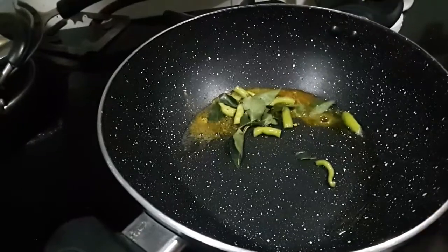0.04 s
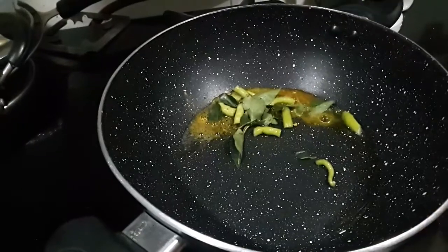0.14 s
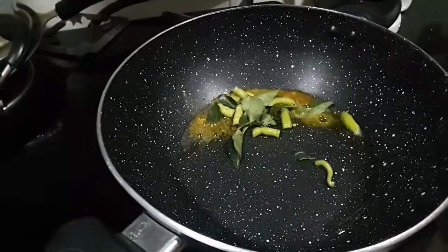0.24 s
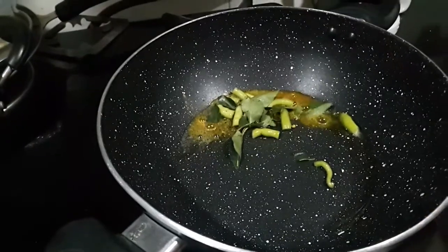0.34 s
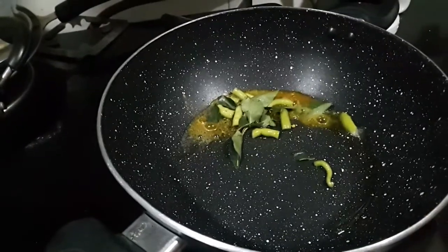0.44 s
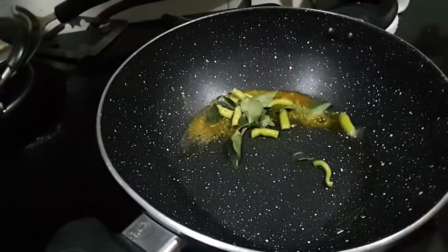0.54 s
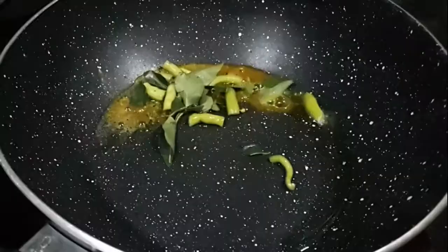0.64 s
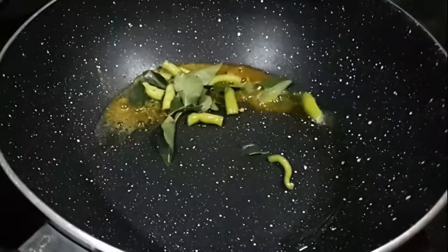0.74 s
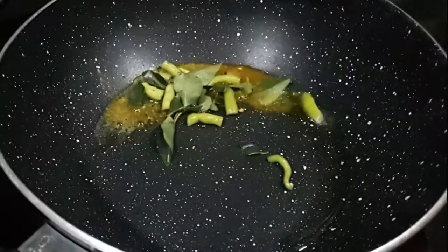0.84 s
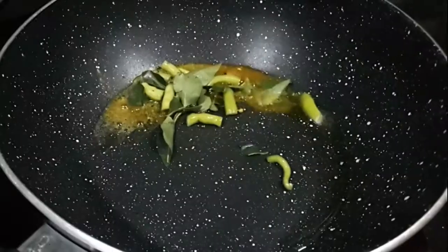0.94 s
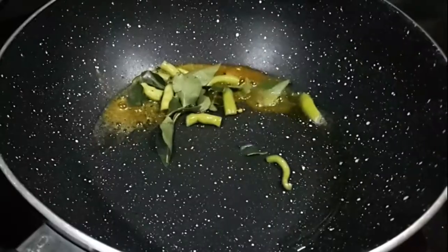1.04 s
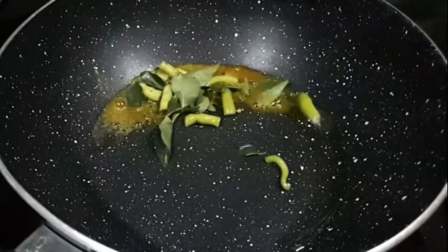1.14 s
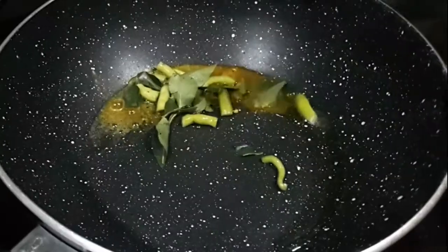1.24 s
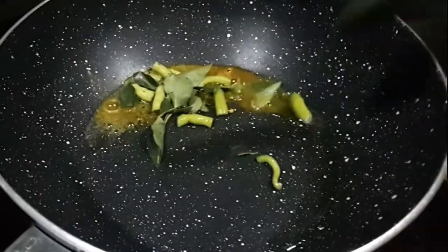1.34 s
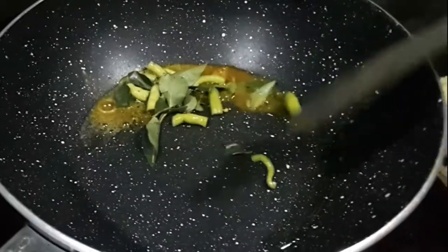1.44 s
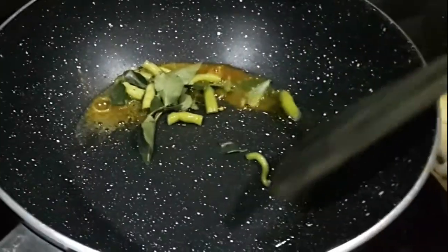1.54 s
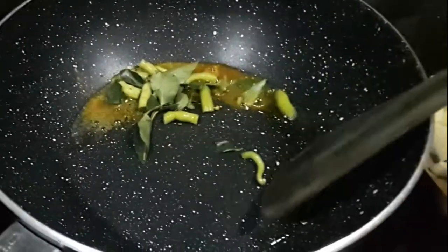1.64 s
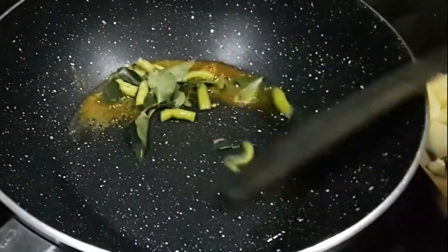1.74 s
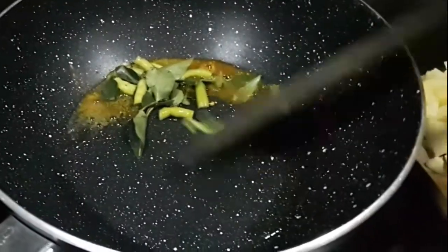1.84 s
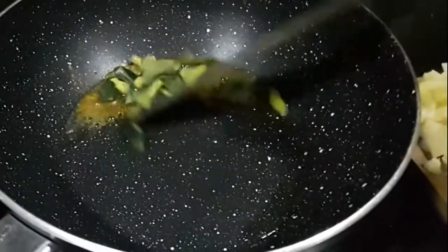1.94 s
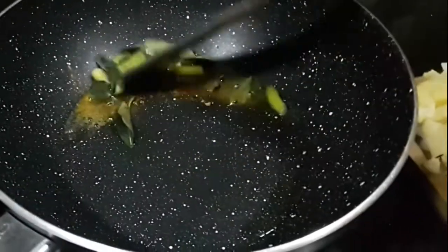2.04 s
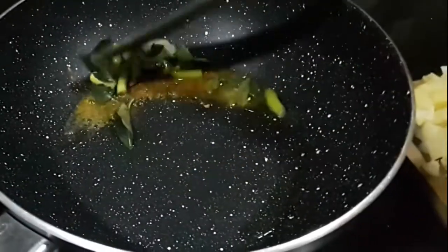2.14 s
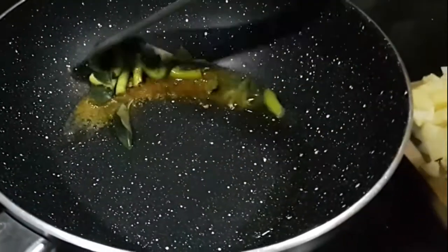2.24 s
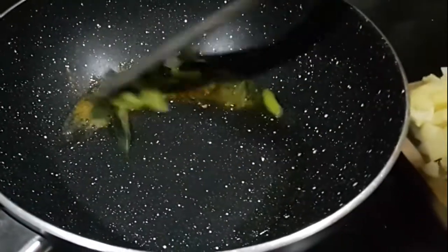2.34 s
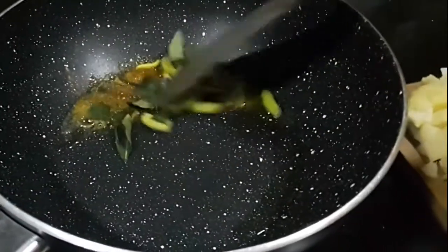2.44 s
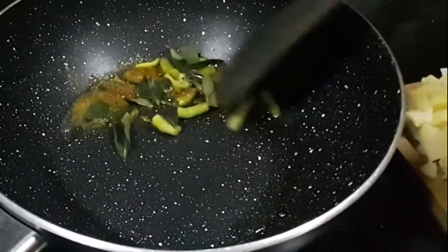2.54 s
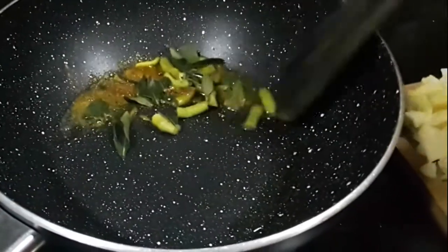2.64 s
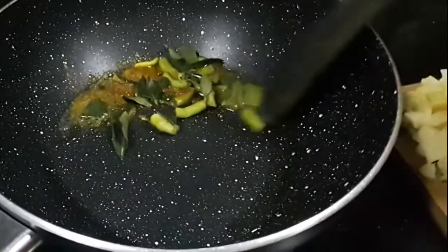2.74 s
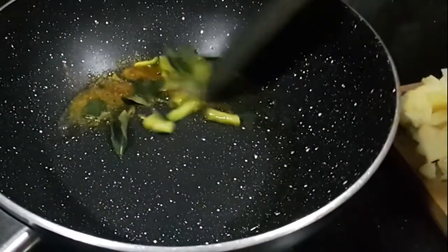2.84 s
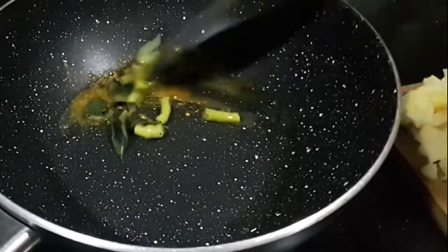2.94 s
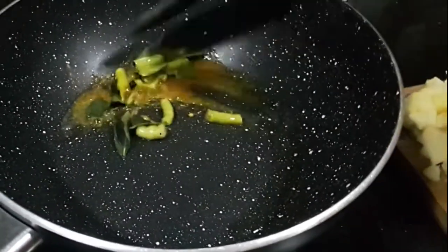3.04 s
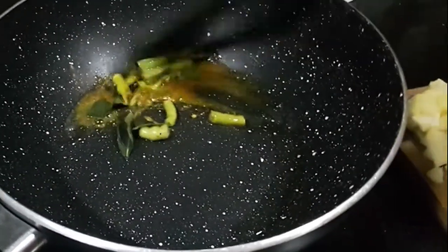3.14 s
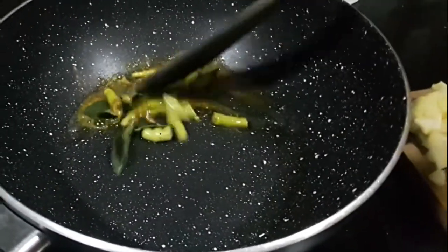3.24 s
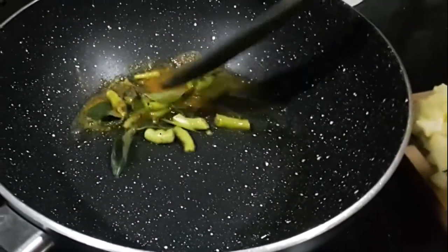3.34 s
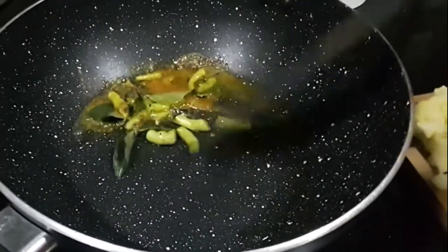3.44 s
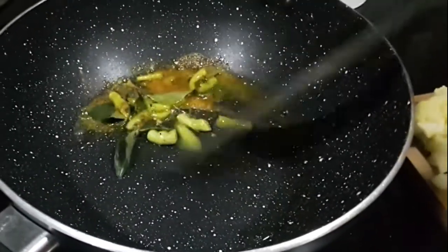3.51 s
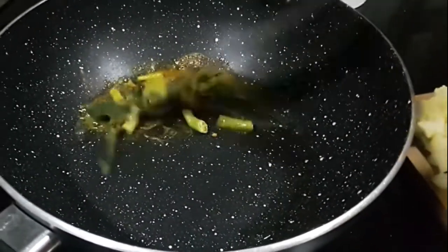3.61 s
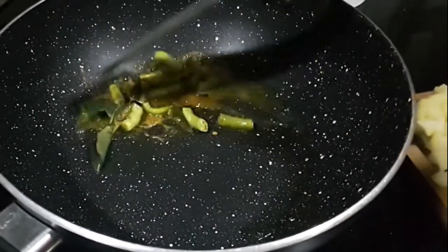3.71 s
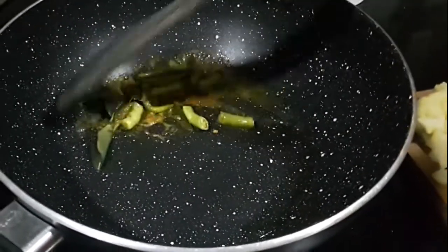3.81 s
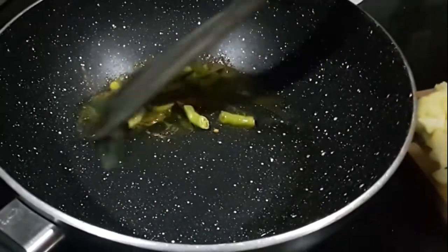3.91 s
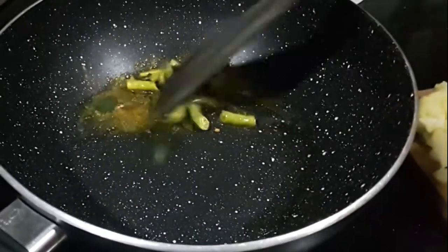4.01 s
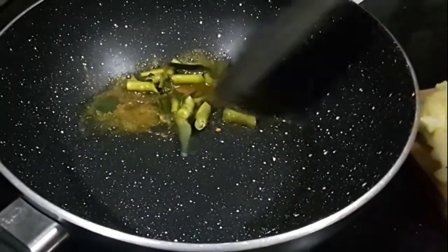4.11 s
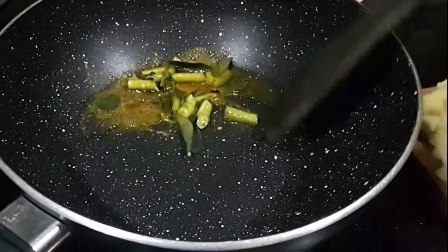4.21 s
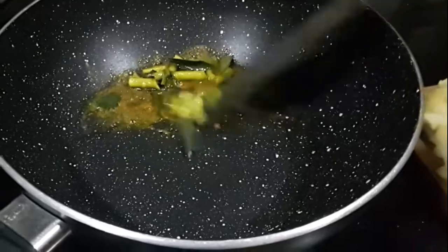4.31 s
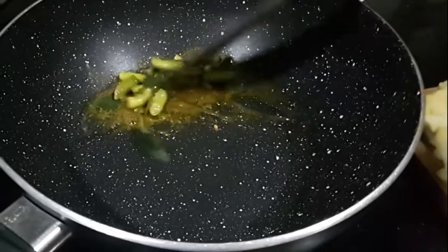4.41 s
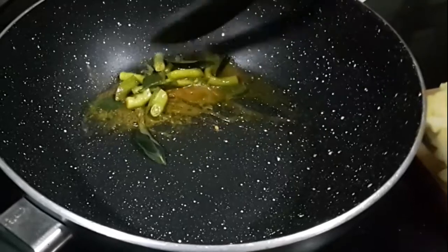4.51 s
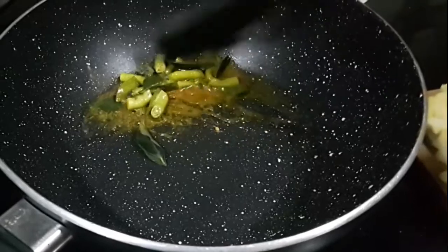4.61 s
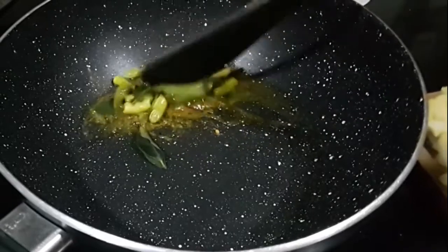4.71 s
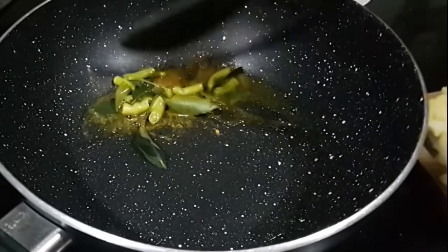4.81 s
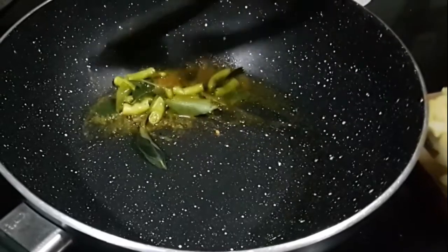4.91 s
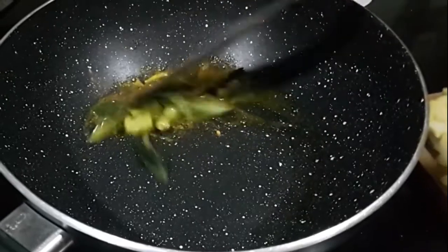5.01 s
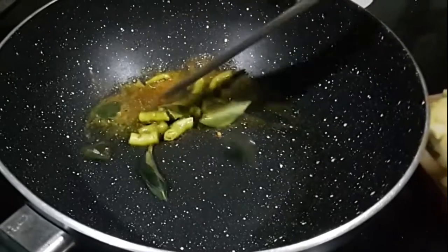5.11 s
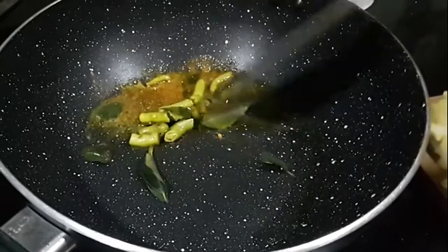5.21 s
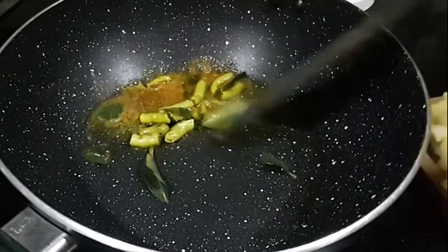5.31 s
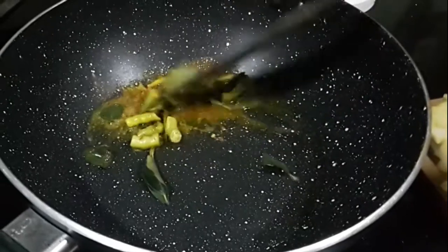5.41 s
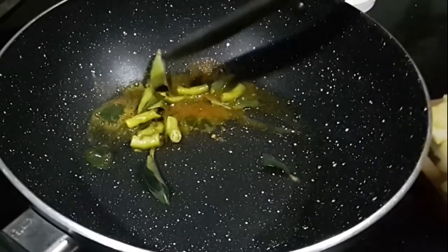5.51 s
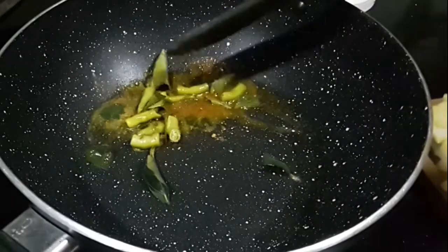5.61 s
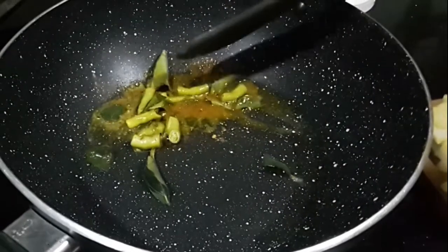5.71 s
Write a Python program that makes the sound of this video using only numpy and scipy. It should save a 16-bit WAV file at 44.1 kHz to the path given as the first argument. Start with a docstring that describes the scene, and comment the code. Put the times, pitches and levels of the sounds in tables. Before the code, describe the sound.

Close, crisp frying hiss with spits and crackles, then hollow metallic pan knocks and short scrapes over a faint low stove rumble.

```python
"""Chilies and leaves frying in a small kitchen

Close by, a little oil in a coated pan: steam bubbles burst as pings over a hiss, and stirring makes it swell.
Drops of water pop as short ringing noise and spit as puffs of noise. A spatula knocks and scrapes: the modes of
the pan ring, struck by blows or rubbed by tiny slips. The stove is a low steady rumble of filtered noise; a
diffuse tail places the oil and the spatula in the room, and short reflections follow the spatula."""
import sys
import numpy as np
from scipy import signal
from scipy.fft import rfft, irfft
from scipy.io import wavfile
from scipy.ndimage import uniform_filter1d

SR = 44100
rng = np.random.default_rng(int(sys.argv[2]) if len(sys.argv) > 2 else 0)


def unload_wav(signal):
    """Save mono or channel-first audio to the path in sys.argv[1] as 16-bit WAV at rate SR, clipped to [-1, 1]."""
    wavfile.write(
        sys.argv[1],
        SR,
        np.round(np.clip(np.atleast_2d(signal).T, -1, 1) * 32767).astype(np.int16),
    )


N = 254016
TIME = np.arange(N) / SR


def gain_of(db):
    """Decibels to amplitude."""
    return 10 ** (np.asarray(db) / 20)


def evened(x):
    """Scales to rms 1."""
    return x / np.sqrt(np.mean(x ** 2) + 1e-20)


def decay_of(t, t60):
    """Exponential decay that falls by 60 dB in t60 seconds."""
    return np.exp(-np.log(1000) * t / t60)


def sides(left_db):
    """Left and right gains whose ratio is left_db."""
    return gain_of([[left_db / 2], [-left_db / 2]])


def read(points, hz):
    """Reads a table on a log-frequency axis."""
    f, value = np.transpose(points)
    return np.interp(np.log(hz + 1), np.log(f + 1), value)


def add(mix, s, sound):
    """Adds a two-channel sound at time s, cut off at the end of the mix."""
    part = mix[:, round(s * SR):][:, :sound.shape[1]]
    part += sound[:, :part.shape[1]]


def coloured(x, spectrum):
    """Filters by a table of Hz and dB."""
    count = x.shape[-1]
    filter_gain = gain_of(read(spectrum, np.fft.rfftfreq(count, 1 / SR)))
    return irfft(rfft(x) * filter_gain, count)


def band_noise(hz, octaves, count):
    """Two channels of noise in a bell around hz."""
    f = np.fft.rfftfreq(count, 1 / SR) + 1
    bell = 1 / (1 + (np.log2(f / hz) / octaves) ** 2) ** 2
    return evened(irfft(rfft(rng.standard_normal((2, count))) * bell, count))


def stereo_noise(count):
    """White noise as a diffuse field gives it: alike on both sides in the bass only."""
    # Each row: frequency in Hz, left-right likeness from 0 to 1.
    likeness = [(60, 0.87), (150, 1), (300, 0.9), (700, 0.17), (1500, 0), (5000, 0)]
    a, b = rfft(rng.standard_normal((2, count)))
    same = np.clip(read(likeness, np.fft.rfftfreq(count, 1 / SR)), -1, 1)
    return irfft(np.array([a, same * a + np.sqrt(1 - same ** 2) * b]), count)


def drift(per_s):
    """Random wandering of rms 1, with little above per_s Hz."""
    lowpass = 1 / (1 + (np.fft.rfftfreq(N, 1 / SR) / per_s) ** 4)
    return evened(irfft(rfft(rng.standard_normal(N)) * lowpass, N))


def sizzle(hiss_db=-3, pings_db=-3, flicker_db=1.54, split_hz=5800):
    """Separate bubbles over the hiss of countless smaller ones; fine and coarse ones swell with the stirring."""
    # Colour of the frying. Each row: frequency in Hz, relative level per Hz in dB.
    fizz_colour = [(300, -52), (1000, -6), (1800, -4.5), (2500, -4), (3400, 0), (4400, 0), (5800, -4),
                   (7400, -6), (8500, -5), (9400, -1.5), (10500, -3.5), (12500, -5), (15600, -5)]
    # The bowl reflects each pitch differently to each side. Each row: frequency in Hz, left-right in dB.
    fizz_sides = [(60, 1.5), (99, 2.0), (160, 0.5), (270, 6), (450, 9), (740, -7), (1220, 11), (2010, 0.5),
                  (3330, 3), (5500, -1.5), (9080, 2), (15000, 0)]
    fine, coarse = frying()
    pings = bubbles(per_s=4500, spread_db=4.2, cycles=2.02, clump_db=0.5)
    hiss = rng.standard_normal((2, N))
    source = coloured(gain_of(pings_db) * pings + gain_of(hiss_db) * hiss, fizz_colour)
    lean_db = read(fizz_sides, np.fft.rfftfreq(N, 1 / SR))
    source = irfft(rfft(source) * gain_of([lean_db / 2, -lean_db / 2]), N)
    low = signal.sosfiltfilt(signal.butter(3, split_hz, fs=SR, output="sos"), source)
    fizz = evened(source - low) * fine + evened(low) * coarse
    return fizz * gain_of(flicker_db * drift(29))


def bubbles(per_s, spread_db, cycles, clump_db, count=64):
    """Bursting bubbles of many sizes: each a ping of a few cycles, arriving in clumps from all over the pan."""
    out, t = np.zeros((2, N)), np.arange(256) / SR
    for hz in np.geomspace(1500, 15500, count):
        events = round(per_s * N / SR / count)
        when, chance, sign = rng.random((events, 3)).T
        clump = np.interp(when, np.linspace(0, 1, 280), rng.standard_normal(280))
        # many small bursts and few strong ones
        size = gain_of(spread_db * np.minimum(-np.log(1 - chance), 4.8) + clump_db * clump)
        bursts = np.bincount((when * N).astype(int), size * np.sign(sign - .5), N)
        phase = rng.random((2, 1))  # in cycles, one per side
        ping = np.exp(-t * hz / cycles) * np.sin(2 * np.pi * (hz * t + phase))
        out += np.sqrt(hz) * evened(signal.oaconvolve(bursts[None], ping, axes=1)[:, :N])
    return evened(out)


def frying(hold_s=0.015, fall_db_per_s=70, simmer_coarse_db=-43, coarse_follows=0.95):
    """Amplitudes of fine fizz and coarse bubbling: the simmer plus a flare for each stir."""
    # Sizzle where the food lies still. Each row: time in seconds, level in dB.
    simmer = [(0, -42), (.5, -38.5), (.58, -35), (1.05, -38.5), (1.55, -40.5), (2.0, -39.5), (2.2, -33.5),
              (3.6, -35.5), (5.76, -37.5)]
    # Each stir turns wet sides into the oil and the sizzle flares.
    # Each row: start in seconds, peak in seconds, level in dB, coarse bubbling against fine fizz in dB.
    stirs = [(1.99, 2.263, -35.5, -8), (2.43, 2.69, -35.5, -3.5), (2.83, 3.03, -26.5, -7.5),
             (3.254, 3.36, -32.5, -15), (3.78, 4.087, -33, -11), (4.322, 4.448, -33.5, -20),
             (4.69, 4.768, -33, -15), (4.92, 5.12, -32, -8.5)]
    simmer_db = np.interp(TIME, *np.transpose(simmer))
    fine = gain_of(simmer_db) ** 2
    # the coarse bubbling follows a share of the simmer's swing
    coarse = gain_of(simmer_coarse_db + coarse_follows * (simmer_db - simmer_db.mean())) ** 2
    for start, peak, db, coarse_db in stirs:
        # a flare holds briefly, then dies as the water boils off
        fall_db = fall_db_per_s * np.maximum(TIME - peak - hold_s, 0)
        rise = np.interp(TIME, [start, peak], [0, 1]) ** 1.24
        power = rise * gain_of(db - fall_db) ** 2
        fine = fine + power
        coarse = coarse + power * gain_of(coarse_db) ** 2
    return np.sqrt(fine), np.sqrt(coarse)


def spatter(pop_db=-1, spit_db=3):
    """Water drops explode in the oil as sharp pops, or vent as brief jets."""
    # The loudest pops, before pop_db. Each row: time in seconds, peak in dB, pitch in Hz, decay time in seconds.
    loud_pops = [(.230, -21, 12100, 0.00067), (0.3411, -19, 5440, 0.00089), (.538, -13, 8700, .0015),
                 (.655, -17, 8000, 0.00036), (.8261, -17, 6170, 0.0011), (.9896, -13, 9000, .0006),
                 (1.172, -18.5, 7500, .0007), (1.2307, -21, 5400, .0019), (1.2966, -23.5, 5000, 0.0026),
                 (1.6385, -25, 4900, .0025), (1.6677, -24, 8700, 0.0027), (2.1641, -17, 9600, 0.0057),
                 (2.2866, -19, 9100, 0.0049), (2.437, -21, 4050, 0.0023), (3.1474, -21.5, 5550, 0.0053),
                 (3.726, -21.5, 7040, 0.00079), (4.2923, -22, 5200, .0035), (5.685, -12.5, 10500, 0.00055)]
    # Spits, short jets of steam, before spit_db.
    # Each row: time in seconds, level in dB, pitch in Hz, decay time in seconds.
    steam_jets = [(0.525, -34.5, 3300, 0.017), (0.537, -28, 11000, 0.0053), (0.572, -35, 5000, 0.006),
                  (0.674, -35.5, 4080, 0.0094), (1.18, -34.5, 4560, 0.0084), (2.111, -35.5, 4300, 0.0065),
                  (2.268, -37, 3360, 0.018), (2.619, -31, 3400, 0.014)]
    out, t = np.zeros((2, N)), np.arange(SR // 5) / SR
    for s, db, hz, decay in loud_pops + small_pops():
        octaves = .55 * (.001 / decay) ** 0.53  # the longer a pop rings, the purer it is
        pop = band_noise(hz, octaves, count=len(t)) * np.exp(-t / decay)
        add(out, s, gain_of(db + pop_db) * pop / abs(pop.mean(0)).max())
    for s, db, hz, decay in steam_jets:
        puff = np.sqrt(2 * np.e * t / decay) * np.exp(-t / decay)  # peaks at 1
        add(out, s, gain_of(db + spit_db) * puff * band_noise(hz, octaves=0.72, count=len(t)))
    return out


def small_pops(per_s=6):
    """Lesser pops at random moments, in rows like those of the loudest pops."""
    count = round(per_s * N / SR)
    when = rng.uniform(0, N / SR, count)
    peak_db = rng.uniform(-32.5, -24.5, count)
    hz = rng.uniform(2960, 9800, count)
    decay_s = rng.uniform(.0005, 0.0039, count)
    return list(zip(when, peak_db, hz, decay_s))


def knocks(rattle_t60=0.096, crack_db=3, crack_t60=0.0055, blade_left_db=6, blade_t60=0.042):
    """Each blow cracks, then rings the pan, the blade and a dense short rattle; soft blows lose their treble."""
    # Colour of crack and rattle. Each row: frequency in Hz, level in dB.
    clack_colour = [(50, -40), (130, -20), (200, -26), (270, -8.5), (420, -16), (530, -14), (680, 9.5),
                    (1000, -2.5), (1350, 1.5), (1700, -5), (2200, 1), (3500, -3.5), (4200, -11),
                    (9000, -39)]
    out, t = np.zeros((2, N)), np.arange(SR // 2) / SR
    fade = gain_of(crack_db) * decay_of(t, crack_t60) + decay_of(t, rattle_t60)
    for s, db, place, hard_hz, blade_db, blade_hz in blows():
        # light, hard blows rattle most for their strength
        rattle_db = -15 - 0.4186 * db + 4 * np.log2(hard_hz / 2500)
        noise = rng.standard_normal(len(t)) + stereo_noise(len(t))  # half direct, half scattered by the bowl
        rattle = gain_of(rattle_db) * evened(coloured(noise, clack_colour)) * fade
        # the hand damps the blade quickly
        blade = gain_of(blade_db) * decay_of(t, blade_t60) * np.cos(2 * np.pi * blade_hz * t)
        blow = pan_ring(place) + rattle + blade * sides(blade_left_db)
        add(out, s, gain_of(db) * signal.lfilter(*signal.butter(2, hard_hz, fs=SR), blow))
    out = signal.lfilter(*signal.iirnotch(490, 3, fs=SR), out)  # antiresonance below the main ring
    return signal.lfilter(*signal.butter(2, 90, "high", fs=SR), out)  # a pan radiates little bass


def blows(bounce_s=.066, bounce_db=-16.5, bounce_dulling=0.51, bounce_above_db=-7.5):
    """The spatula's blows; each strong one bounces once, softer and duller."""
    # Each row: time in seconds, level in dB, place from 0 pan floor to 1 pan wall,
    # hardness as a cut-off in Hz, ring of the blade in dB against the blow, pitch of the blade in Hz.
    struck = [(.7645, -27.5, .6, 750, 6, 662), (1.789, -7.5, 0.14, 2100, -13, 1396),
              (1.973, -23, 0.04, 1150, -14, 1380), (2.3694, -25.5, .95, 740, -14, 1290),
              (2.7496, -19, 0.65, 5100, 3, 1223), (2.8242, -18, 0.2, 2200, -1, 1355),
              (3.1951, -13.5, 0.59, 2700, 3, 1282), (3.5926, -3.5, 0.25, 2520, -13.5, 1250),
              (3.982, -35.5, 0.22, 6500, -13, 1280), (4.1653, -41.5, .86, 5000, 6, 1260),
              (4.3385, -5.5, 0.11, 3960, -10.5, 1394), (4.683, -14.5, 0.85, 1400, -1.5, 1313),
              (4.7355, -19, 0.93, 1340, -10, 1395), (5.0049, -20, 0.92, 1090, -3, 1150),
              (5.384, -5.5, 0.14, 2820, -11, 1375)]
    bounces = [(s + bounce_s, db + bounce_db, place, hard_hz * bounce_dulling, blade_db, blade_hz)
               for s, db, place, hard_hz, blade_db, blade_hz in struck if db > bounce_above_db]
    return struck + bounces


def pan_ring(place, rise_cycles=1.0):
    """The pan's answer to a tap between its floor (0) and wall (1); each mode builds up within a cycle or so."""
    # Modes of the pan. Each row: frequency in Hz, level in dB struck on the floor, level in dB struck on the wall,
    # time to fall by 60 dB in seconds, left-right in dB.
    pan_modes = [(132.4, -32, -18.5, 0.26, 0), (266.6, -18, -9, 0.083, -1.5), (326, -30, -17, 0.18, 0),
                 (640, -70, 3, 0.05, 5), (699, -32, -11, 0.088, -2), (707, -8, -3, 0.19, -1),
                 (768, -4.5, -22, 0.15, 3), (742.8, -2, -22, 0.098, 2.5), (910, -34, -50, 0.33, 18),
                 (1222, -24, -4.5, 0.086, 10), (1334, -14.5, -16, 0.047, 13), (1340, -27.5, -50, 0.32, 0),
                 (1350, -22, -53, 0.068, 24), (1816, -18.5, -7, 0.021, -8), (2187, -41, -6, 0.11, 7),
                 (2620, -48, -28, 0.04, -3), (2895, -30.5, -55, 0.17, 20), (2900, -19, -71, 0.091, -8),
                 (3434, -17.5, -23, 0.042, -4), (3475, -11.5, -19, 0.053, -3)]
    t, ring = np.arange(SR // 2) / SR, 0
    for hz, floor_db, wall_db, t60, left_db in pan_modes:
        build_up = 1 - np.exp(-t * hz / rise_cycles)
        swing = build_up * decay_of(t, t60) * np.cos(2 * np.pi * hz * t)
        ring = ring + sides(left_db) * gain_of(floor_db + place * (wall_db - floor_db)) * swing
    return ring


def strokes(slips_per_s=1500, soft_hz=2600, sing_hz=745, waver=0.0279, sing_db=-1, slips_db=-6):
    """The sliding blade catches and slips, ringing the pan and making it sing; pushed food adds a dull rustle."""
    # Each row: start, peak and end in seconds, rubbing of the pan in dB, dull shoving of the food in dB.
    slides = [(1.33, 1.354, 1.63, -51.5, -70), (1.8, 1.991, 2.097, -30.5, -64),
              (2.327, 2.463, 2.557, -47.5, -39.5), (2.872, 2.925, 3.07, -37, -53),
              (3.036, 3.06, 3.11, -63, -39), (3.917, 4.012, 4.3, -59, -48.5), (4.72, 4.86, 7.8, -63, -54)]
    slips = rng.standard_normal(N) * (rng.random(N) < slips_per_s / SR)
    slips = signal.lfilter(*signal.butter(2, soft_hz, fs=SR), slips)
    rub = evened(signal.oaconvolve(slips[None], pan_ring(place=0.62), axes=1)[:, :N])
    rub /= np.sqrt(uniform_filter1d((rub ** 2).mean(0), size=2500) + 1e-6)  # the hand keeps the force even
    sing_phase = 2 * np.pi * np.cumsum(sing_hz * (1 + waver * drift(100.0))) / SR
    sing = (1 + 0.27 * drift(56)) * np.sin(sing_phase)
    rub = gain_of(slips_db) * rub + gain_of(sing_db) * evened(sing)
    shove = evened(band_noise(225, octaves=1.3, count=N)[0])
    out = np.zeros((2, N))
    for start, peak, end, rub_db, shove_db in slides:
        # pressure builds slowly, then the blade lifts off quickly
        press = np.interp(TIME, [start, peak], [0, 1]) ** 1.4
        lift = np.sqrt(np.interp(TIME, [peak, end], [1, 0]))
        out += press * lift * (gain_of(rub_db) * rub + gain_of(shove_db) * shove)
    return out


def stove(level_db=-45.0):
    """A low steady rumble: diffuse noise shaped by a spectrum."""
    # Each row: frequency in Hz, relative level per Hz in dB.
    rumble_colour = [(15, -44), (25, -23), (59, -8), (131, 1), (153, -3), (168, -15), (225, -9), (257, 0.5),
                     (306, -6), (357, -9.5), (459, -3.5), (505, -10.5), (701, -7.5), (1090, -14),
                     (2500, -17), (3250, -42), (5500, -120)]
    return evened(coloured(stereo_noise(N), rumble_colour)) * gain_of(level_db)


def nearby(x):
    """First reflections from the hob and the wall, delayed and weakened on each side."""
    # Each row: left delay in seconds, left gain, right delay in seconds, right gain.
    reflections = [(.0052, 0.11, .0061, 0.093), (0.012, 0.041, 0.013, 0.033), (.0225, .16, .0262, .08)]
    out = x.copy()
    for left_s, left, right_s, right in reflections:
        add(out, left_s, x * [[left], [0]])
        add(out, right_s, x * [[0], [right]])
    return out


def kitchen(x, wet_db, delay_s=.009):
    """A diffuse tail, each band dying at its own speed; long waves reach both sides alike."""
    # Each row: frequency in Hz, time to fall by 60 dB in seconds.
    tail_t60 = [(150, 0.79), (700, 0.3), (1500, 0.35), (4000, 0.38), (14000, 0.24)]
    taps = stereo_noise(SR // 2) * (np.arange(SR // 2) > delay_s * SR)
    hz, t, bands = signal.stft(taps, SR, nperseg=256)
    tail = signal.istft(bands * decay_of(t, read(tail_t60, hz)[:, None]), SR)[1]
    tail /= np.linalg.norm(tail[0])
    return x + gain_of(wet_db) * signal.fftconvolve(x, tail, axes=1)[:, :N]


def scene():
    """Oil, spatula and stove in the kitchen."""
    oil = kitchen(sizzle() + spatter(), wet_db=-4.5)
    spatula = kitchen(nearby(knocks() + strokes()), wet_db=-8.5)
    return oil + spatula + stove()


def record(dry, ceiling=.9, edge_hz=16000):
    """The loudest peaks are rounded off below the ceiling; then the treble is cut above edge_hz."""
    rounded = dry / (1 + (dry / ceiling) ** 6) ** (1 / 6)
    lowpass = signal.firwin(511, edge_hz, window=("kaiser", 9), fs=SR)
    return signal.oaconvolve(rounded, lowpass[None], "same")


dry = scene()
out = record(dry)
unload_wav(out)
```